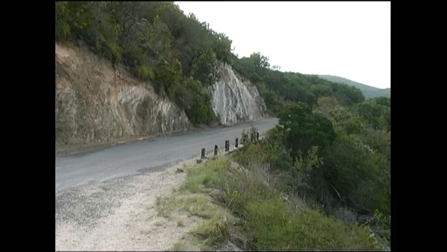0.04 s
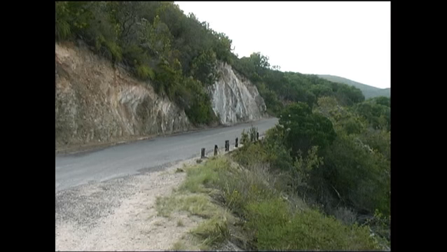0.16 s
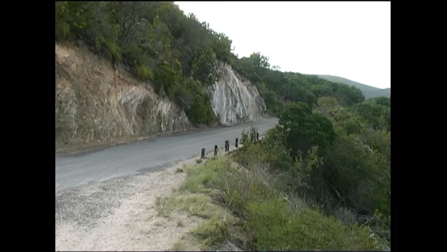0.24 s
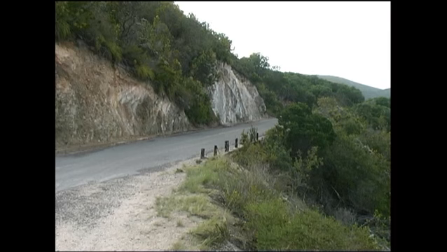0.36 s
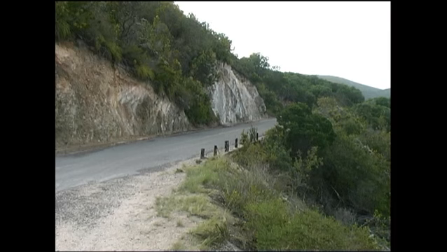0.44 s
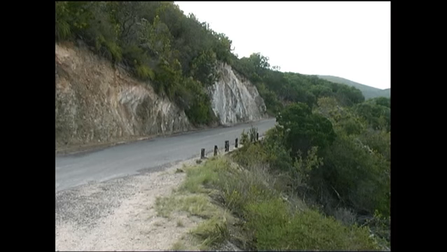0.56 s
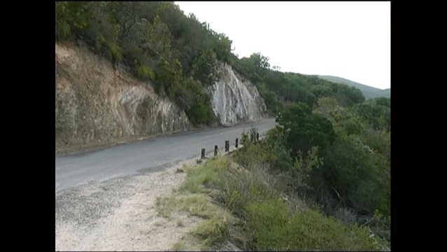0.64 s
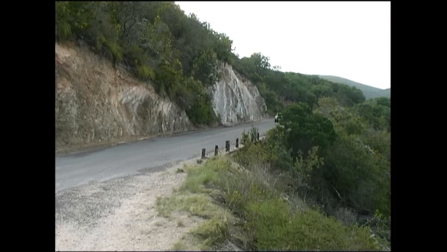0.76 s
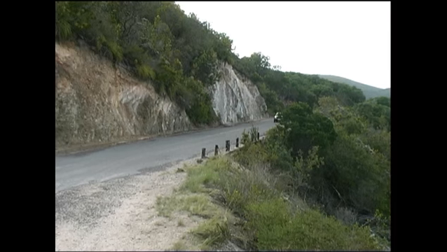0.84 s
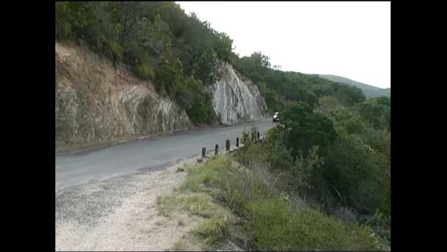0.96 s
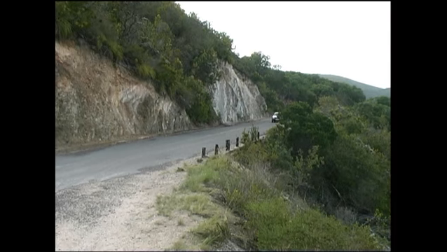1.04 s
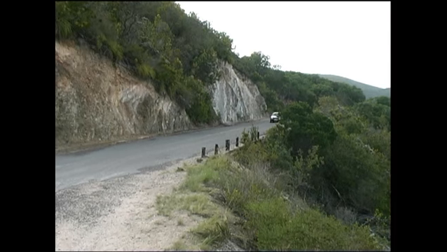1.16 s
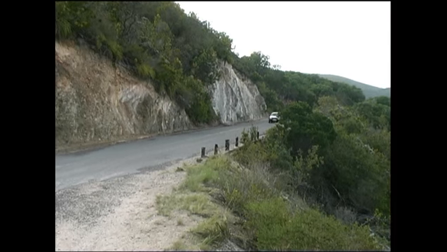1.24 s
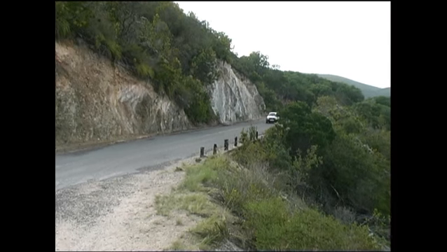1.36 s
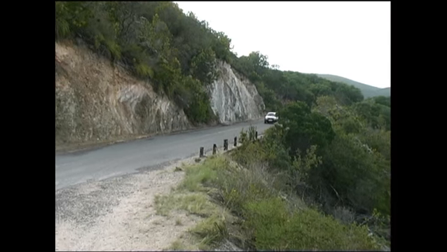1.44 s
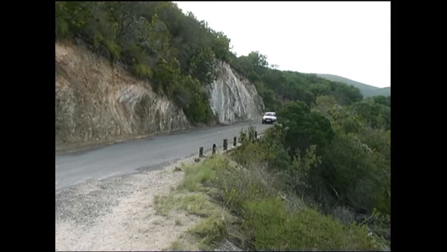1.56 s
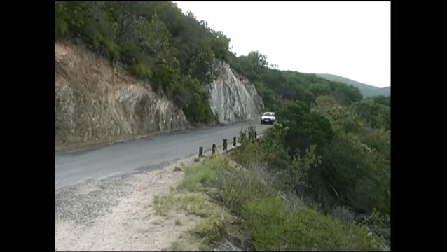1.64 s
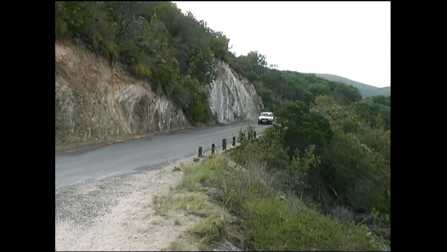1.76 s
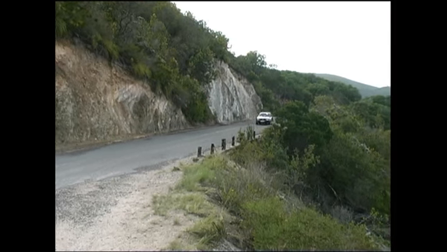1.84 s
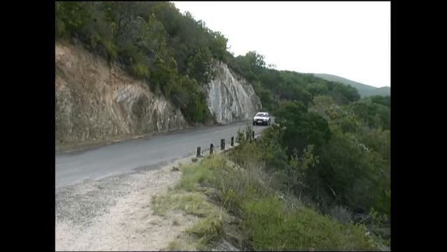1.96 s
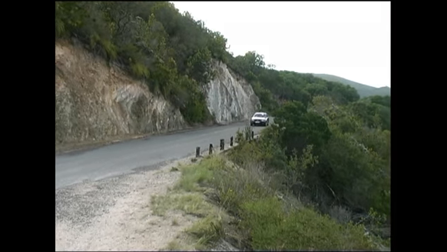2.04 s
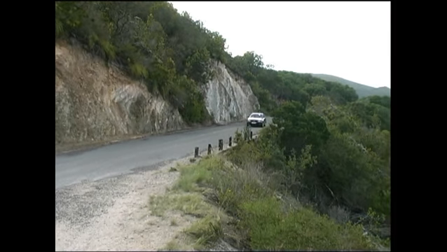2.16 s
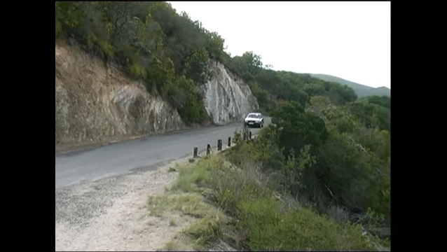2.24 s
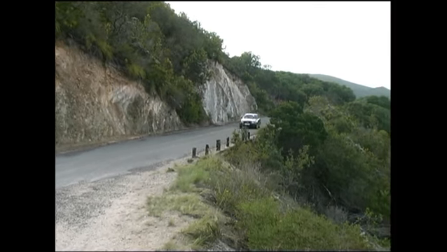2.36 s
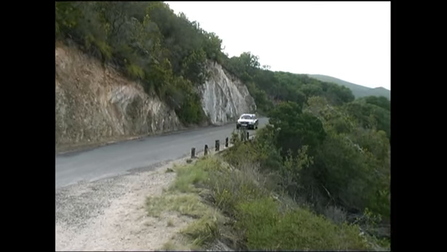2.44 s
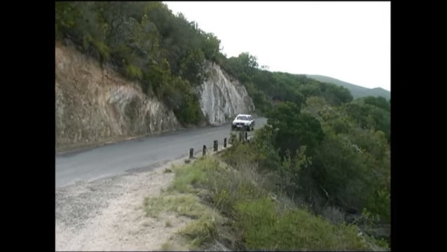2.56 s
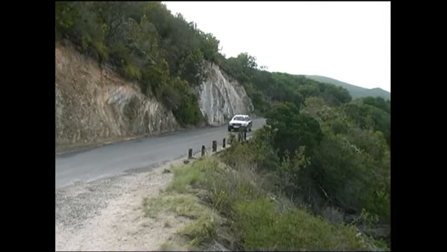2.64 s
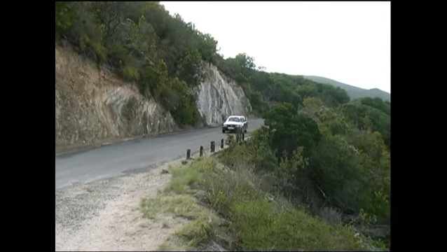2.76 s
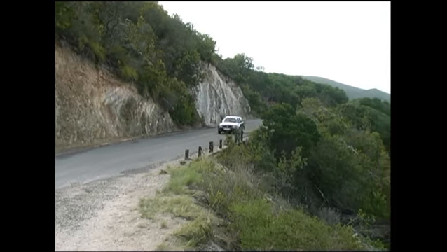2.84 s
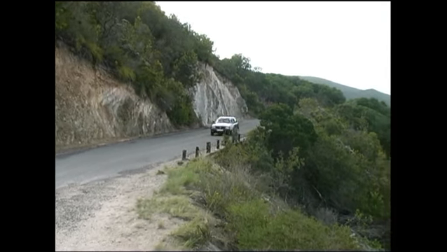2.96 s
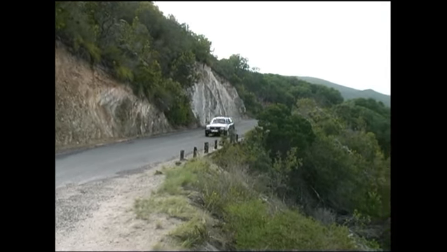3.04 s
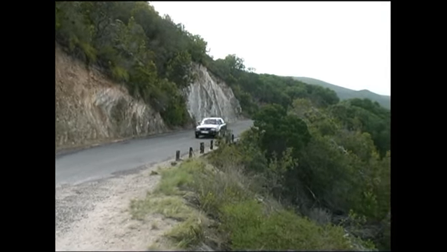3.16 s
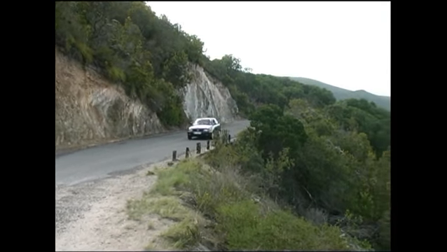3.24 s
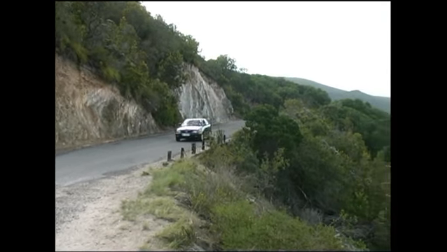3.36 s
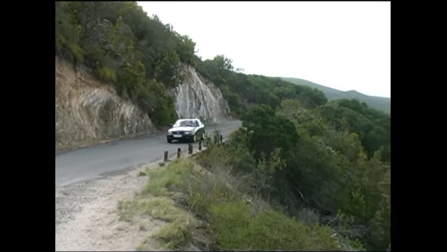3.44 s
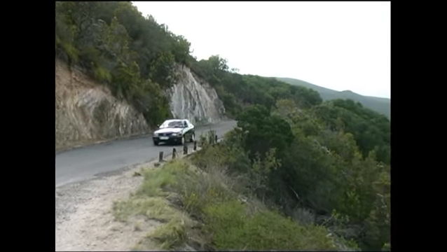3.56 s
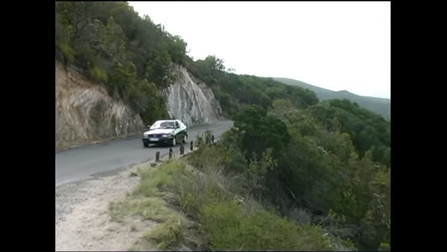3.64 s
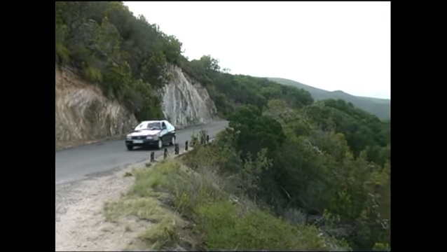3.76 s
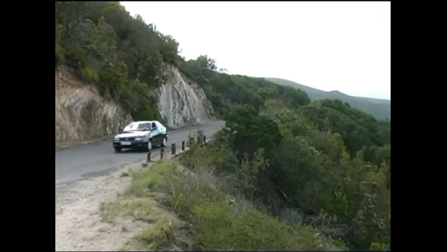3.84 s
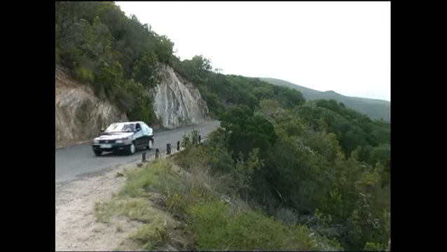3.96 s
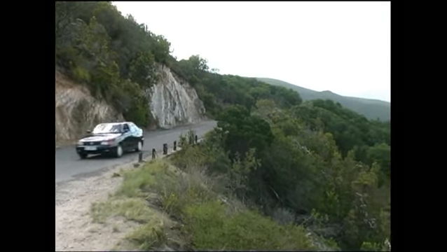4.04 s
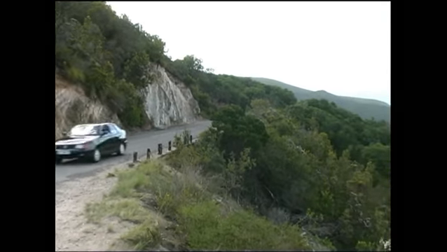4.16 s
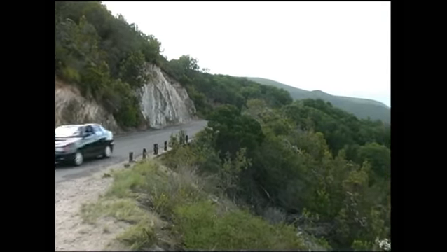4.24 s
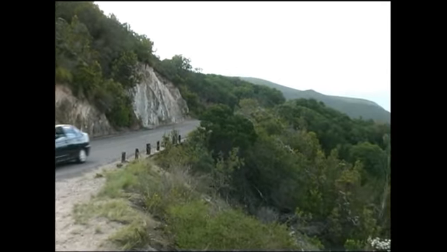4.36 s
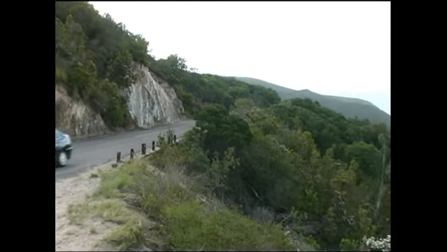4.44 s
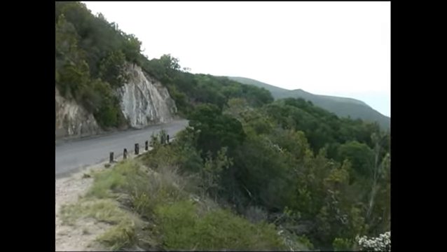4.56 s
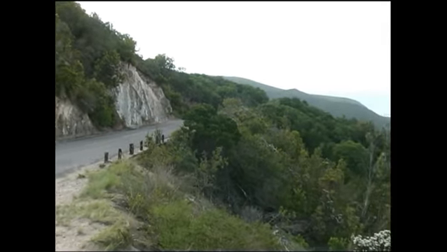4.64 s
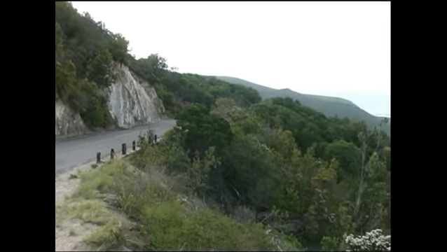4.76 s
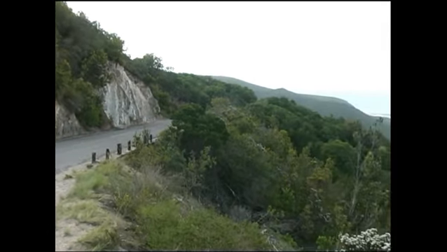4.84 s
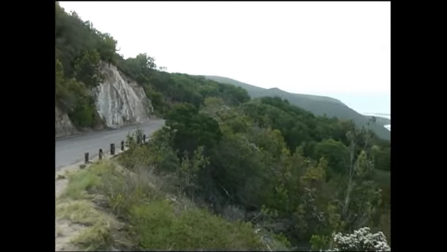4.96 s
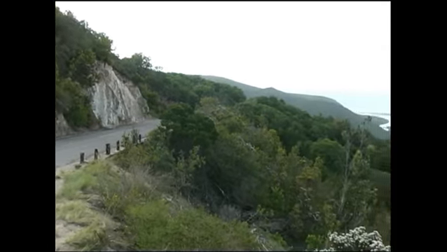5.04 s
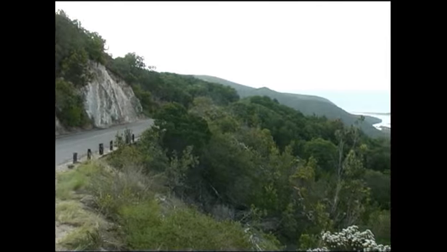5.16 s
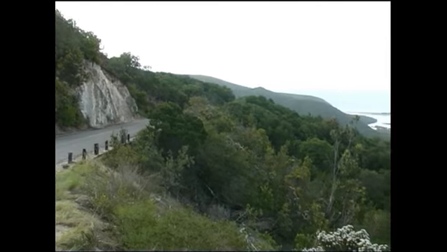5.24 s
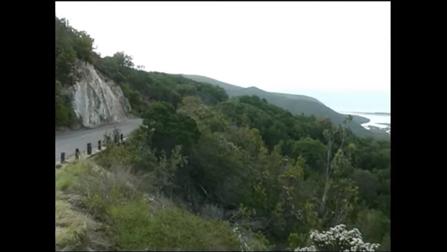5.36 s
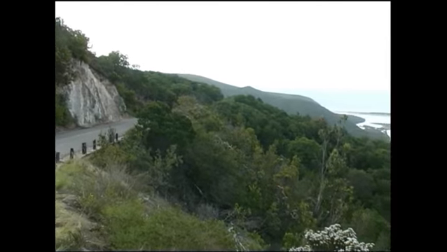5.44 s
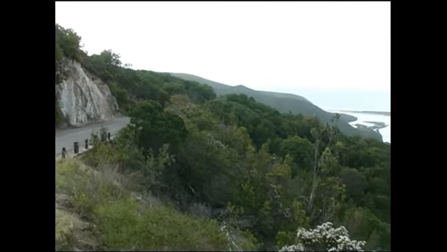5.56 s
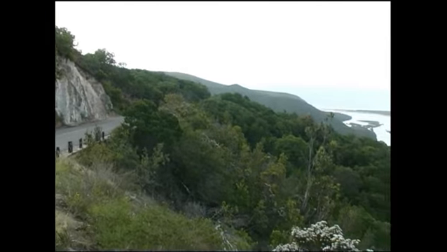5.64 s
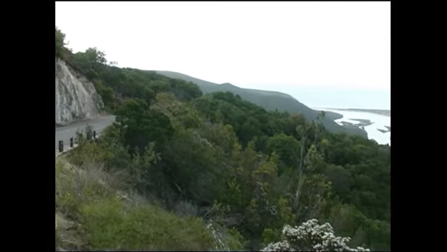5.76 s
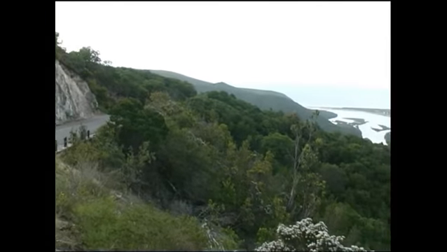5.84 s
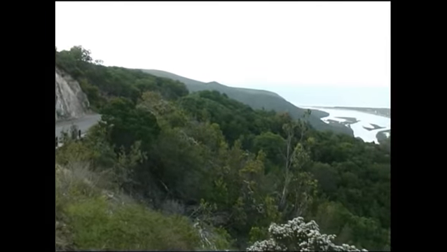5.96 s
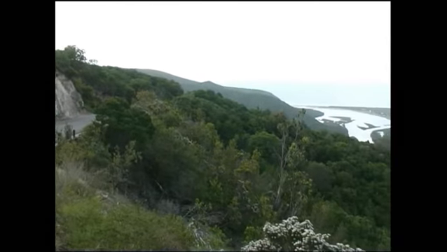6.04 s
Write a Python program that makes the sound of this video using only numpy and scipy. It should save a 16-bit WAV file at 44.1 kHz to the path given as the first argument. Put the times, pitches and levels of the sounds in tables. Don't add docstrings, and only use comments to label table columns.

```python
import sys
import numpy as np
from scipy import signal
from scipy.io import wavfile
from scipy.ndimage import uniform_filter1d

SR = 44100
rng = np.random.default_rng(int(sys.argv[2]) if len(sys.argv) > 2 else 0)


def to_linear_factor(level_db):
    exponent = np.asarray(level_db, float) / 20
    return 10 ** exponent


def waveform_to_disk(signal):
    frames = np.transpose(np.atleast_2d(signal))
    scaled = np.clip(frames, -1, 1) * 32767
    samples = np.round(scaled).astype(np.int16)
    wavfile.write(sys.argv[1], SR, samples)


N = 268789

# time_s, nearness_db (over the far bend), direction (0 ahead, 1 left, 2 behind)
CAR_PATH = [(0, -1, .011), (.6, 2.5, .015), (1.3, 4, .025), (1.8, 8, .04), (2.4, 10, .08), (3, 12.5, .15),
            (3.5, 17, .25), (3.9, 19.5, .39), (4.3, 21.5, .42), (4.55, 22.5, .67), (4.8, 24.5, 1),
            (5, 25, 1.05), (5.2, 22.5, 1.24), (5.4, 21.5, 1.56), (5.55, 21.3, 1.7), (5.74, 19.8, 1.96),
            (6.1, 16, 1.97)]
# bend_db, slope_db_per_db, close_db, clear_of_bank_db, behind_db
ROLLING_LAYERS = [
    (-47, 0.45, 7, 4.5, 0.6),
    (-42.5, 0.45, 3, 3.1, -0.7),
    (-57, 1.01, -0.8, 0.1, 0.1),
    (-80, 0.95, 4, 0.1, 1.6),
]
# freq_hz, level_db
RUMBLE_SPECTRUM = [(12, -32), (25, -2.5), (55, 3), (110, 1.3), (170, 0.5), (250, -1), (330, -6.5),
                   (450, -13), (800, -7), (1500, -40), (10500, -41), (15500, -53)]
# freq_hz, level_db
ROAR_SPECTRUM = [(150, -34), (350, 0), (570, -0.9), (750, -2.2), (1100, 0.13), (1600, -0.4), (2200, -0.5),
                 (2800, -3), (3400, -6.5), (4500, -12), (7000, -45), (16000, -64)]
# freq_hz, level_db
HISS_SPECTRUM = [(1500, -1.5), (3000, -1.5), (4000, -1.8), (5000, -1.5), (6000, -5.5), (8000, -11.5),
                 (10000, -16), (11300, -28), (13000, -46)]
# freq_hz, level_db
SPRAY_SPECTRUM = [(8000, -25), (10500, 0.5), (11600, -2), (13200, -1.5), (14100, -9), (15500, -16),
                  (17000, -24)]
# centre_hz, width_hz, gain_db
TYRE_HORN = (1117, 555, 8.9)
# centre_hz, width_hz, gain_db, climb_per_direction
ECHO_NOTCHES = [(385, 70, -8, .06), (690, 55, -5, .03), (950, 65, -4.5, 0), (1385, 75, -8, .03),
                (1600, 70, 2.5, 0), (1830, 95, -7.5, .08), (2350, 90, -3, .05), (5300, 400, -2.5, 0),
                (11300, 500, -4, 0)]
# time_s, firing_hz, level_db
FIRING_NOTE = [(0.07, 83, -41), (0.8, 80, -41), (1.2, 82.6, -41.5), (1.8, 84, -40), (2.4, 82.4, -36),
               (2.95, 81.4, -36), (3.2, 81.4, -33), (3.45, 76.5, -31), (3.9, 76.2, -29.5),
               (4.15, 79.2, -27), (4.7, 77.6, -24), (4.85, 78, -19.5), (5.15, 77.5, -13.5), (5.33, 76, -13),
               (6.09, 75.8, -16.5)]
# firing_multiple, level_db (over the rumble), width_hz
FUZZY_OVERTONES = [(.52, -16.5, 19), (1.27, -11, 20), (1.55, -15, 16), (2.01, -11.5, 9.64),
                   (3.01, -13.5, 12.8)]
# time_s, depth_db, half_length_s
NOTE_FADES = [(0.07, -15, .14), (0.3, -12.5, .085), (0.425, -14, .06), (0.635, -17, .07), (0.79, -15, .1),
              (1.01, -17, .065), (1.43, -20, .07), (1.575, -12, .045), (1.74, -4.5, .15), (2.06, -17, .06),
              (2.27, -7, .11), (2.43, -18, .045), (3.04, -10, .085), (3.235, -15, .115), (3.54, -15, .07),
              (3.84, -12, .06), (4.09, -13, .1), (4.29, -4, .08), (4.48, -7, .04), (4.76, -5, .025),
              (4.83, -3, .03)]
# start_s, length_s, first_hz, climb_hz_per_s, level_db
WHISTLES = [
    (.548, .06, 3380, 14000, -55),
    (1.355, .023, 2500, 11000, -55),
    (1.356, .02, 3700, 3000, -54),
    (1.385, .145, 2720, 5900, -49.5),
    (5.712, .03, 5500, 8000, -53),
    (5.738, .027, 5250, 24000, -50),
    (5.85, .13, 2870, 4200, -45.5),
    (5.88, .016, 6550, 10000, -50),
    (5.988, .03, 6600, 24000, -54),
]
# start_s, peak_db, centre_hz, width_hz, left_right_db
STONES = [(2.849, -52, 10240, 4014, -1), (3.5, -36, 11520, 8000, -2), (3.7935, -30, 10090, 901, -5),
          (3.7935, -42, 13500, 4010, -4), (3.858, -43, 11500, 5000, -2), (3.874, -44, 13000, 2500, -3),
          (4.001, -42, 13050, 3000, -3), (4.022, -41, 14480, 1998, -3), (4.0345, -28, 12510, 2500, -4),
          (4.0356, -21, 7500, 6000, -1), (4.036, -27, 12500, 4006, -8), (4.0472, -29, 8300, 1200, 3),
          (4.1859, -20, 7200, 3000, 0), (4.1862, -36, 14400, 1988, -4), (4.189, -29, 13000, 2000, -6),
          (4.34, -25, 7500, 2995, 1), (4.3405, -33, 13320, 1800, -4), (4.544, -36, 12580, 3500, -6),
          (4.656, -34, 8970, 3000, 3), (4.677, -31, 9000, 3480, 2), (4.829, -32, 10500, 3002, 2),
          (4.829, -36, 14550, 2500, -3), (4.8395, -30, 10700, 2000, -8)]
# freq_hz, left_lead_rad, left_right_db, likeness
AHEAD_PORTS = [(80, -.47, -1.5, .995), (260, -1.3, -1.4, .97), (420, -2.6, -4.3, .93),
               (630, -3.26, -.7, .98), (740, -4.35, 2.2, .94), (1200, -5.2, .3, .95), (8000, -6.4, .3, .88),
               (12000, -6, -2, .7)]
# freq_hz, left_lead_rad, left_right_db, likeness
LEFT_PORTS = [(80, -.45, -1.7, 1), (260, -1.3, -3.3, .98), (420, -2.75, -2.5, .95), (520, -3.15, -5, .94),
              (740, -3.52, 2.5, .97), (2300, -4.87, 12.3, .85), (8000, -5.5, 8.5, .55),
              (12000, -4.5, 1, .55)]
# freq_hz, left_lead_rad, left_right_db, likeness
BEHIND_PORTS = [(80, -.43, -1.6, 1), (150, -.48, -1.8, .99), (260, -1.41, -3.9, .98),
                (630, -2.97, -3, .985), (980, -3.15, .1, .995), (1600, -3.68, 10.5, .72),
                (2300, -4.35, 7, .89), (12000, -3.55, -.5, .68)]
# freq_hz, width_hz, level_db
DRIVE_WHINE = [(8230, 120, -77), (8760, 140, -72), (9180, 150, -77)]

FRAME, HOP = 1024, 256
ALONGSIDE_DB = 25
CLEAR_S, CLEARING_S = 4.05, 0.15
HORN_AHEAD, HORN_OPENS, HORN_SHUT, HORN_TURN = 0.88, 0.2, 2.08, 0.9
FLANK, FLANK_WIDTH, FLANK_DB = 1.2, 0.35, -3.2
LONG_WHISTLE_S, EDGE_DB = 0.1, -5
HOOK_HZ, HOOK_S = 750, 0.045
SCOOP_HZ, SCOOP_S = -300, 0.03
PREAMP_DB, OPEN_S, OPENING_S = -69, 0.061, 0.004


def unit_rms(x):
    return x / np.sqrt(np.mean(x ** 2) + 1e-20)


def bump(x, centre, half_width):
    return np.clip(1 - abs(x - centre) / half_width, 0, 1)


def resonance(hz, centre_hz, width_hz):
    return 1 / (1 + ((hz - centre_hz) / width_hz) ** 2)


def at_freq(table, hz):
    freq_hz, *columns = np.transpose(table)
    return [np.interp(np.log(hz + 1), np.log(freq_hz + 1), c)[:, None] for c in columns]


def at_time(table, t):
    time_s, *columns = np.transpose(table)
    return [np.interp(t, time_s, c) for c in columns]


def unit_power(table, hz):
    power = to_linear_factor(2 * at_freq(table, hz)[0])
    return power / power.sum()


def add_at(mix, start_s, sound):
    part = mix[:, round(start_s * SR):][:, :sound.shape[1]]
    part += sound[:, :part.shape[1]]


def wavering(width_hz):
    r = np.exp(-np.pi * width_hz / SR)
    noise = rng.standard_normal(N) + 1j * rng.standard_normal(N)
    z = signal.lfilter([1], [1, -2 * r, r * r], noise)
    return z / np.sqrt(np.mean(abs(z) ** 2))


def ports(hz, direction):
    ahead_share = np.clip(1 - direction, 0, 1)
    left_share = bump(direction, 1, 1)
    behind_share = np.clip(direction - 1, 0, 1)
    columns = zip(at_freq(AHEAD_PORTS, hz), at_freq(LEFT_PORTS, hz), at_freq(BEHIND_PORTS, hz))
    phase_rad, ratio_db, likeness = (ahead_share * a + left_share * l + behind_share * b for a, l, b in columns)
    ratio, half_turn = to_linear_factor(ratio_db), np.exp(0.5j * phase_rad)
    right = np.sqrt(2 / (1 + ratio ** 2))
    return ratio * right * half_turn, right / half_turn, np.clip(likeness, 0, 1) ** 0.6


def drive_past(t):
    near_db, direction = at_time(CAR_PATH, t)
    close = (near_db / ALONGSIDE_DB) ** 2
    behind = np.clip(direction - 1, 0, 1)
    clear = np.clip((t - CLEAR_S) / CLEARING_S, 0, 1)
    levels_db = [bend_db + slope * near_db + close_db * close + clear_db * clear + behind_db * behind
                 for bend_db, slope, close_db, clear_db, behind_db in ROLLING_LAYERS]
    return direction, levels_db


def rolling_power(hz, t):
    direction, (rumble_db, roar_db, hiss_db, spray_db) = drive_past(t)

    opening = HORN_AHEAD + HORN_OPENS * np.clip(direction / 0.6, 0, 1)
    facing = opening * np.clip((HORN_SHUT - direction) / HORN_TURN, 0, 1)
    horn_hz, horn_width_hz, horn_gain_db = TYRE_HORN
    horn_db = horn_gain_db * facing * resonance(hz, horn_hz, horn_width_hz)
    roar_db = roar_db + FLANK_DB * bump(direction, FLANK, FLANK_WIDTH)

    brighter_db = 5.8 * np.clip((0.4 - abs(direction - 1.36)) / 0.1, 0, 1) * np.clip(hz / 3000 - 3.1, 0, 1)
    thinner_db = -6.5 * bump(direction, 0.9, 0.6) * np.clip(1.6 - hz / 70, 0, 1)

    bins_hz = hz[:, 0]
    power = unit_power(ROAR_SPECTRUM, bins_hz) * to_linear_factor(2 * (roar_db + horn_db - 2.0))
    power += unit_power(HISS_SPECTRUM, bins_hz) * to_linear_factor(2 * (hiss_db + 1.28))
    power += unit_power(SPRAY_SPECTRUM, bins_hz) * to_linear_factor(2 * (spray_db - 1.0 + brighter_db))
    power += unit_power(RUMBLE_SPECTRUM, bins_hz) * to_linear_factor(2 * (rumble_db + 0.5 + thinner_db))

    echo = np.clip(2.2 - 1.7 * direction, 0, 1)
    notches_db = sum(db * resonance(hz, centre_hz * (1 + climb * direction), width_hz)
                     for centre_hz, width_hz, db, climb in ECHO_NOTCHES)
    return power * to_linear_factor(2 * echo * notches_db)


def rolling():
    frames, hz = N // HOP + 5, np.fft.rfftfreq(FRAME, 1 / SR)
    t = np.arange(frames) * HOP / SR
    a, b, c, d, patches = rng.standard_normal((frames, len(hz), 5)).T
    patches = uniform_filter1d(patches, size=12, axis=0)
    patches = unit_rms(uniform_filter1d(patches, size=12, axis=1))
    surface = unit_rms(uniform_filter1d(rng.standard_normal(frames), size=3))
    size = np.sqrt(1.685 * rolling_power(hz[:, None], t)) * to_linear_factor(0.76 * patches + 0.44 * surface)

    left, right, likeness = ports(hz, drive_past(t)[0])
    shared, separate = a + 1j * b, c + 1j * d
    right_noise = likeness * shared + np.sqrt(1 - likeness ** 2) * separate
    spectra = np.array([left * shared, right * right_noise]) * size
    return signal.istft(spectra, nperseg=FRAME, noverlap=FRAME - HOP)[1][:, :N]


def exhaust():
    t = np.arange(N) / SR
    firing_hz, note_db = at_time(FIRING_NOTE, t)
    note_db = note_db + sum(depth_db * bump(t, s, half_s) for s, depth_db, half_s in NOTE_FADES)
    rumble_db = drive_past(t)[1][0]
    angle = 2 * np.pi * np.cumsum(firing_hz) / SR
    typical_hz = np.median(firing_hz)

    def partial(multiple, size):
        left, right, _ = ports(np.array([multiple * typical_hz]), 0.84)
        return (np.sqrt(2) * np.vstack([left, right]) * size * np.exp(1j * multiple * angle)).real

    out = partial(1, to_linear_factor(note_db + 0.6) * (1 + 0.07 * wavering(43)))
    for multiple, db, width_hz in FUZZY_OVERTONES:
        out += partial(multiple, to_linear_factor(rumble_db + db) * wavering(width_hz))
    return out


def birds():
    out = np.zeros((2, N))
    for start_s, length_s, first_hz, climb, db in WHISTLES:
        t = np.arange(0, length_s, 1 / SR)
        hz = first_hz + climb * t
        if length_s > LONG_WHISTLE_S:
            hz += HOOK_HZ * np.clip(1 - (length_s - t) / HOOK_S, 0, 1) ** 1.5
            hz += SCOOP_HZ * np.clip(1 - t / SCOOP_S, 0, 1)
        angle = 2 * np.pi * np.cumsum(hz) / SR + np.array([[0.25], [-0.25]])
        level_db = db + 2.1 + EDGE_DB * (2 * t / length_s - 1.1) ** 2
        envelope = np.sqrt(2) * to_linear_factor(level_db) * signal.windows.tukey(len(t), 0.2)
        add_at(out, start_s, envelope * np.sin(angle))
    return out


def grit():
    out, t = np.zeros((2, N)), np.arange(500) / SR
    for start_s, db, hz, width_hz, pan_db in STONES:
        band = signal.butter(2, [hz - width_hz / 2, hz + width_hz / 2], "band", fs=SR, output="sos")
        crack = np.minimum(t / 0.0002, 1) * np.exp(-t / 0.00059)
        rattle = 0.07 * np.exp(-t / 0.0057)
        blow = rng.standard_normal(len(t)) * (crack + rattle)
        tick = signal.sosfilt(band, blow) + 0.06 * np.diff(blow, prepend=0)
        sides_db = db + np.array([[0.5], [-0.5]]) * pan_db
        add_at(out, start_s, to_linear_factor(sides_db) * tick / abs(tick).max())
    return out


def scene():
    return rolling() + exhaust() + birds() + grit()


def top_cut(x):
    return signal.sosfilt(signal.butter(12, 15710, fs=SR, output="sos"), x)


def record(dry):
    t = np.arange(N) / SR
    hiss = to_linear_factor(PREAMP_DB) * signal.lfilter([0.8, 0.2], [1, -1.2, 0.4], rng.standard_normal(dry.shape))
    whine = sum(to_linear_factor(db) * (wavering(width_hz) * np.exp(2j * np.pi * hz * t)).real
                for hz, width_hz, db in DRIVE_WHINE)
    bass_cut = signal.butter(2, 24, "high", fs=SR, output="sos")
    mix = signal.sosfilt(bass_cut, dry + hiss + whine * np.array([[1.5], [0.5]]))
    mix = mix * np.clip((t - OPEN_S) / OPENING_S, 0, 1)
    return top_cut(mix)


dry = scene()
out = record(dry)
waveform_to_disk(out)
```